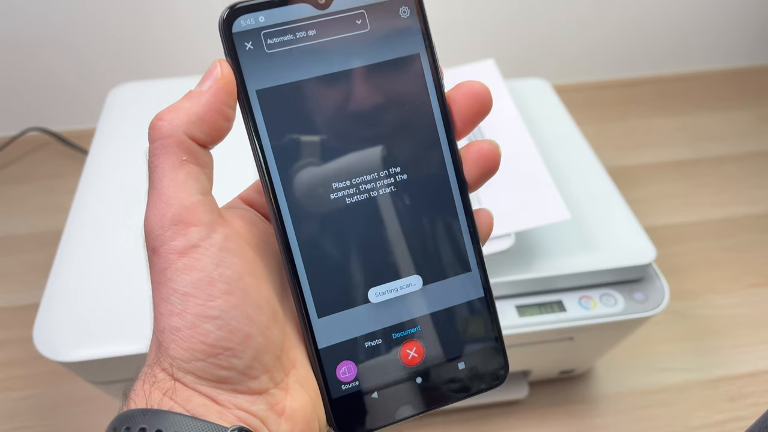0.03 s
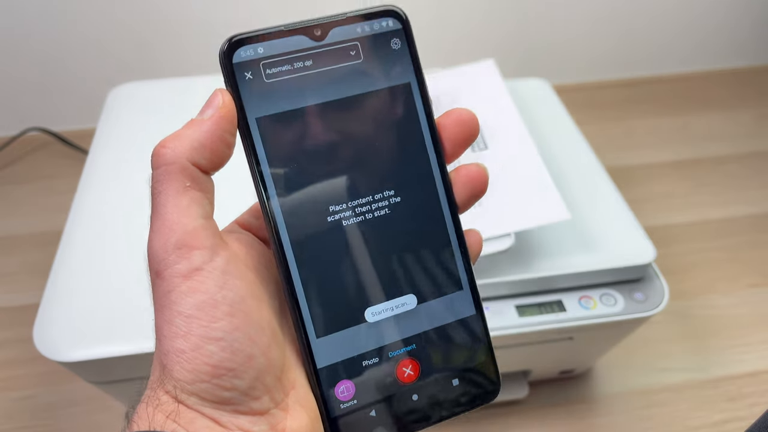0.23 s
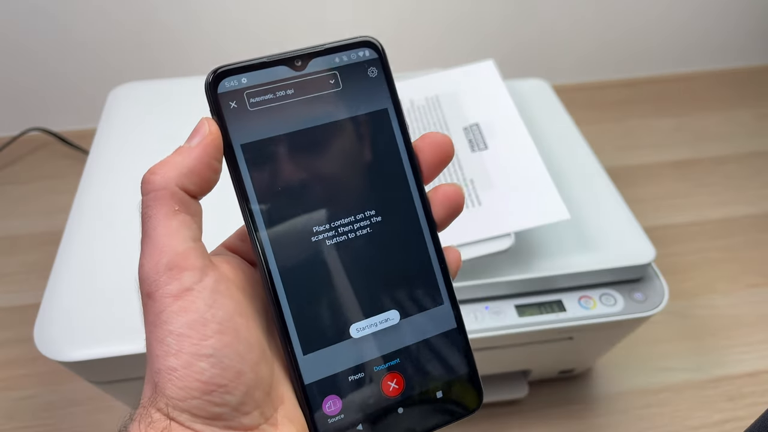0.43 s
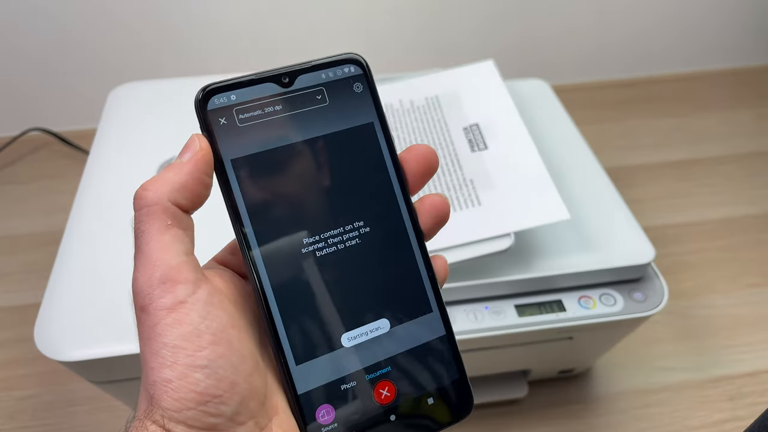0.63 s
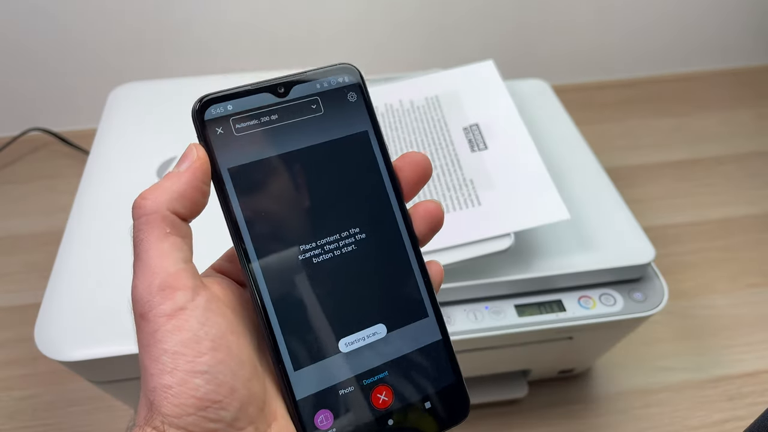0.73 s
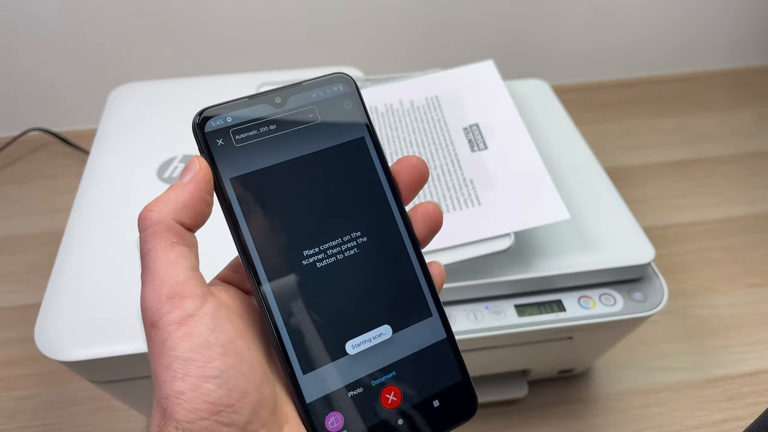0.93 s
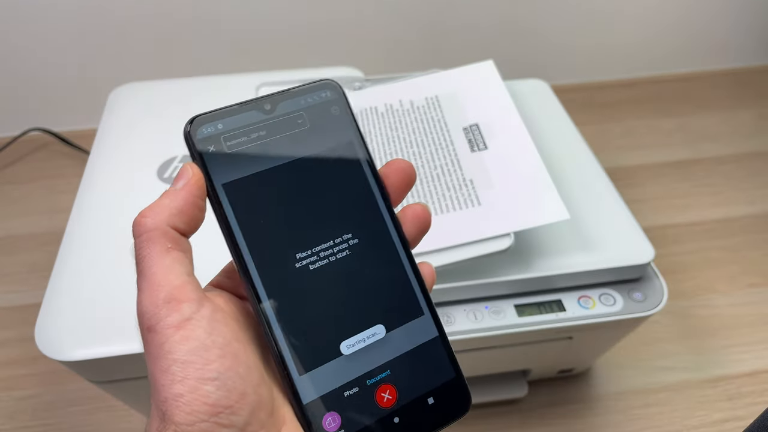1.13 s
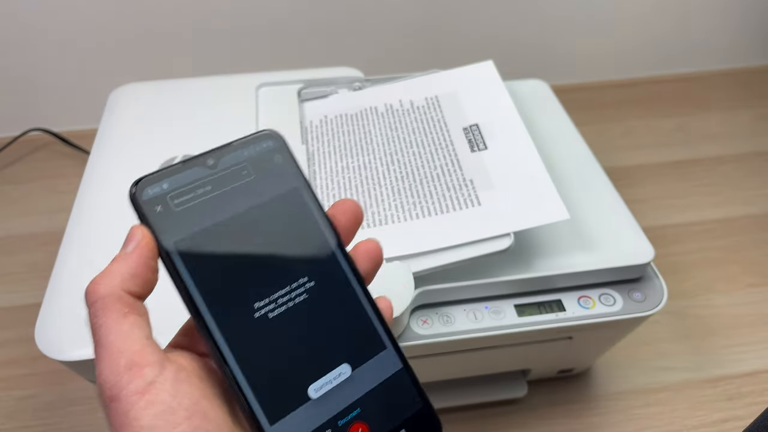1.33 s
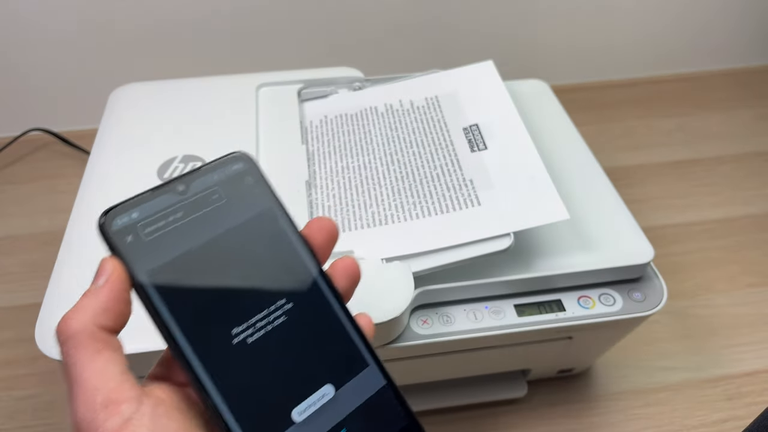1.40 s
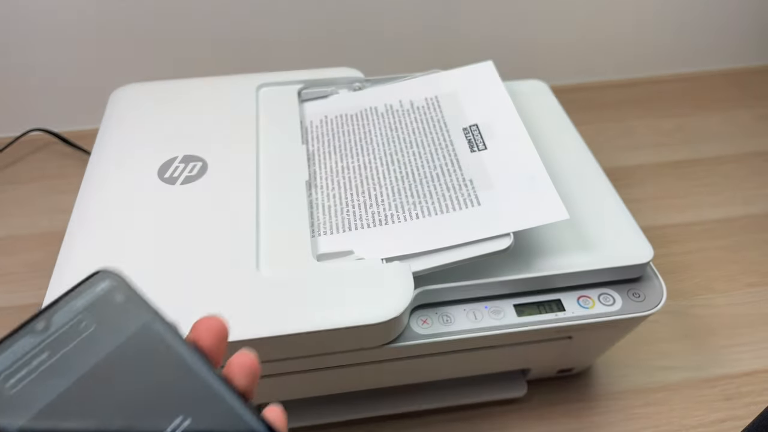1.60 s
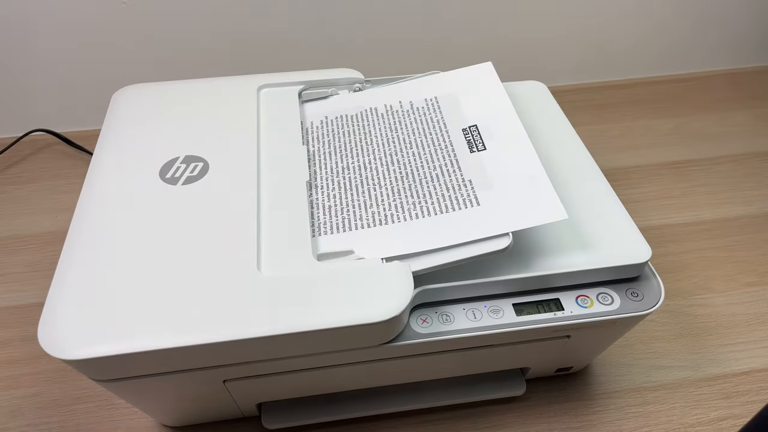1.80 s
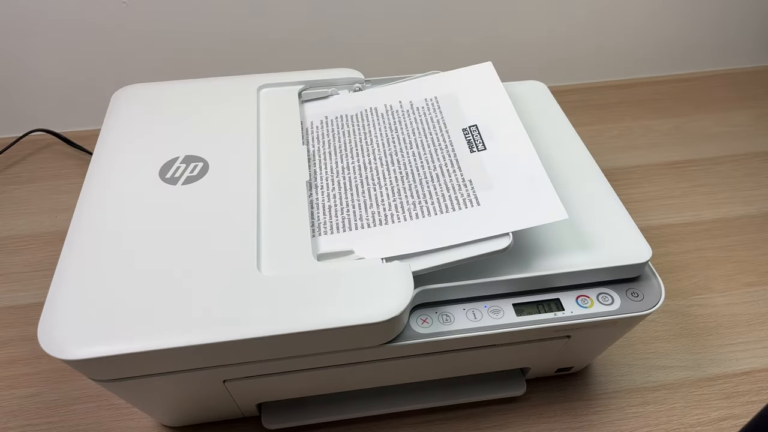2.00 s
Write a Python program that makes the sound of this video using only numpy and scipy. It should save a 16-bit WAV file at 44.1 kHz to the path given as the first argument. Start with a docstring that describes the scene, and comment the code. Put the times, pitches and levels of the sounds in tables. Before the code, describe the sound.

A small printer's feeder motor, close, in a quiet room with a short dull tail. Until 0.9 s only low rumble, mains hum and faint hiss. Then rapid knocks to 1.0 s, a low straining buzz around 1.1 s, and a loud clattering latch clunk at 1.2 s. Rattling gear whir and faint paper rustle continue to 1.6 s, dull knock, brief pause, light knock and restart at 1.75 s, running to the end.

```python
"""Mains hum and low rumble in a quiet room, with faint microphone hiss, before a small desktop printer moves.
Its feeder motor starts with a jolt and strains; a latch snaps over with a clunk; the motor runs on, stops
for a moment and starts again, with paper rustling faintly over the rollers.
Shaft tones and dense tooth impacts make the motor, decaying casing modes and noise the knocks, noise the
paper. The direct sound stands 12 dB above a short, dull tail from desk and walls."""
import sys
import numpy as np
from scipy import signal
from scipy.fft import rfft, irfft
from scipy.io import wavfile
from scipy.ndimage import uniform_filter1d

SR = 44100
rng = np.random.default_rng(int(sys.argv[2]) if len(sys.argv) > 2 else 0)


def wrap_up_sound(samples):
    """Save the sound to the file named by the first command line argument, as 16-bit audio."""
    columns = np.atleast_2d(samples).T
    # keep every value between -1 and 1, then stretch to whole-number steps
    tamed = np.clip(columns, -1, 1)
    steps = np.round(tamed * 32767).astype(np.int16)
    wavfile.write(sys.argv[1], SR, steps)


N = 90449  # samples

# Spectrum of rumble and hiss, relative: pitch_hz, level_db (dB per Hz)
AIR_SPECTRUM = [(15, -18.5), (40, 3), (62, -4.5), (78, -3.5), (95, -15), (200, -21), (400, -26.5),
                (1000, -32.5), (4000, -38.5), (15900, -42)]
AIR_DB = -64.5
# Mains hum: multiple of the mains frequency, level_db
HUM = [(1, -70.5), (2, -87.5), (4, -79), (5, -98.5), (6, -89), (8, -88.5), (10, -104)]
MAINS_HZ = 60

# Motor drive over time: start_s, casing drone level_db, gear rattle level_db, gearbox ringing level_db
DRIVE = [(.9, -99, -127, -90), (.915, -63, -77, -77), (.94, -53, -41.5, -84), (.97, -43.5, -52, -55),
         (1.02, -59, -50.5, -58), (1.06, -47.5, -49.5, -50), (1.13, -89, -47.5, -62),
         (1.17, -54, -52.5, -53), (1.26, -42.5, -45.5, -54), (1.32, -52, -50.5, -52.5),
         (1.5, -55.5, -53, -55), (1.59, -54.5, -53, -53.5), (1.62, -55.5, -61.5, -82),
         (1.68, -72, -66, -76), (1.73, -69, -73, -77), (1.752, -49.5, -51, -53.5),
         (1.85, -53.5, -53, -53.5), (1.95, -55.5, -53, -53), (2.05, -50.5, -51.5, -52.5)]
# Commutator hum, loud while the motor strains: start_s, level_db
STRAIN = [(1.0, -85), (1.04, -46), (1.08, -38), (1.13, -39), (1.18, -46), (1.22, -52), (1.6, -63),
          (1.65, -94), (1.73, -91), (1.76, -58), (2.05, -68)]
# Gear whine: start_s, level_db
WHINE = [(.9, -100), (.925, -58.5), (.96, -69.5), (1.02, -64), (1.05, -61), (1.12, -61), (1.17, -65),
         (1.26, -74), (1.32, -66.5), (1.59, -63.5), (1.63, -108), (1.73, -77), (1.77, -65.5), (2.05, -64)]
# Other shaft orders: multiple of the shaft, level_db against the gear whine
SHAFT_ORDERS = [(6, 2.5), (8, 0.5), (9, 1), (11, -1), (12, -1.5), (13, 3.5), (15, -4.5), (20, -8.5),
                (34, -11), (36, -10.5), (51, -14.5), (53, -17.5), (80, -19)]
# Idler gear tones: multiple of the idler, level_db against the casing drone
IDLER = [(2, -7), (3, -5), (4, -10)]
# Low casing resonances rung by the gears: pitch_hz, width_hz, level_db
CASING = [(134, 60, -4.5), (207, 13.4, -1.5), (230.5, 15, -7), (288, 48, -9), (364, 32, -10.5)]
# Upper gearbox resonances: pitch_hz, width_hz, level_db
GEARBOX = [(450, 77, -7.5), (647, 75, -18.5), (754, 130, -17.5), (1140, 56, -34), (2914, 870, -15.5),
           (4620, 400, -22), (5660, 1150, -30)]
# Gear rattle spectrum, relative: pitch_hz, level_db (dB per Hz)
RATTLE_SPECTRUM = [(70, -3.5), (130, -22), (250, -4), (600, -8), (1300, -13.5), (1600, -18), (2600, -23),
                   (4200, -25), (6500, -40), (9000, -64), (14000, -70)]
SHAFT_HZ, IDLER_HZ = 59.07, 67.1
SPEED_WAVER = .0008  # rms, as a fraction of the shaft speed
GEAR_TEETH = 30
IMPACTS_PER_S, IMPACT_SPREAD_DB = 7000, 1.6
FLUTTER_DB = 1.2  # rms, of each gear-rung resonance

# Blows: start_s, thump level_db, favoured pitch_hz, spread_octaves, clatter level_db, clatter centre_hz,
# clatter t60_s
KNOCKS = [(0.911, -63, 200, 0.68, -87, 1500, 0.023), (0.92, -55, 1500, .4, -57.5, 1480, 0.12),
          (0.9295, -37.5, 408, 0.77, -47, 3530, 0.071), (.940, -53, 1000, 0.88, -58, 3000, 0.025),
          (0.975, -31.5, 197, 0.81, -68, 1510, 0.033), (0.989, -43, 346, 0.23, -60, 1500, 0.053),
          (1.004, -32.5, 100, 0.38, -75, 1500, .04), (1.1885, -43.5, 3280, 0.95, -39.5, 3500, 0.082),
          (1.2037, -32.5, 1350, 0.17, -70, 3000, .03), (1.2085, -31.5, 407, 0.93, -40, 3000, 0.12),
          (1.2143, -26, 189, 0.32, -40.5, 3500, 0.083), (1.222, -30.5, 650, 0.41, -46.5, 6460, 0.086),
          (1.264, -43, 170, 0.54, -67, 3000, 0.068), (1.6, -40.5, 168, 0.17, -86, 2000, 0.036),
          (1.744, -49, 255, 0.77, -72, 2000, 0.068)]
# Modes of the struck casing: pitch_hz, level_db against the thump, t60_s
CASING_MODES = [(58, 2, 0.34), (106, 3, 0.087), (144, -3, 0.045), (187.1, 5, 0.099), (210, -12, 0.66),
                (260, -15, 0.025), (301, 2, 0.09), (378.7, -1, 0.098), (483, -7.5, 0.057), (693, -3.5, 0.1),
                (804, -13.5, 0.21), (1288, 4, 0.017), (2347, 5, 0.081), (3940, 0, 0.04), (6230, -2, 0.054)]
# Spectrum of clattering loose parts, relative: pitch_hz, level_db (dB per Hz)
CLATTER_SPECTRUM = [(500, -5), (1200, 8.5), (1900, -4), (2500, 0.5), (3500, -5.5), (5000, -11.5),
                    (6300, -12.5), (9000, -19), (15900, -29.5)]
BLOW_CYCLES = 0.37  # rise of a thump, in cycles of its favoured pitch
CLATTER_ATTACK_S = .0012

# Paper sliding over the rollers: start_s, level_db
PAPER = [(1.0, -101), (1.05, -76), (1.14, -78), (1.18, -82), (1.28, -71), (1.4, -88.5), (1.9, -91),
         (1.98, -78), (2.05, -80)]
PAPER_HZ, PAPER_WIDTH_HZ = 6940, 3600

RADIATES_HZ = 59.4  # the casing radiates little below this
ROOM_T60_S, ROOM_DB = .33, -12
ROOM_BOTTOM_HZ, ROOM_TOP_HZ = 350, 3700
TOP_HZ = 15800


def undb(db):
    """dB to gain."""
    return 10 ** (np.asarray(db) / 20)


def curve(table, column=1):
    """Gain over time from a dB column of rows led by start_s, silent before the first."""
    rows = np.array(table)
    return undb(np.interp(np.arange(N) / SR, rows[:, 0], rows[:, column], left=-160))


def unit(x):
    """Scale to rms 1."""
    return x / np.sqrt(np.mean(x ** 2))


def colour(x, spectrum):
    """Shape x by a pitch_hz, level_db spectrum, then scale to rms 1."""
    hz, db = np.array(spectrum).T
    log_hz = np.log(np.arange(N // 2 + 1) * SR / N + 1)  # + 1 avoids log(0)
    gain = undb(np.interp(log_hz, np.log(hz), db))
    return unit(irfft(rfft(x) * gain, N))


def ring(x, hz, width_hz):
    """A resonance of gain 1 at its centre."""
    b, a = signal.iirpeak(hz, hz / width_hz, SR)
    return signal.lfilter(b, a, x)


def walk(rate):
    """Smooth random drift of rms 1, averaged twice over 1 / rate seconds."""
    k = int(SR / rate)
    once = uniform_filter1d(rng.standard_normal(N), k)
    return unit(uniform_filter1d(once, k))


def tones(table, phase, waver_db):
    """Multiples of a rotation, each wavering in level."""
    total = np.zeros(N)
    for multiple, db in table:
        gain = np.sqrt(2) * undb(db + waver_db * walk(4.9))  # sqrt(2) gives a sine rms 1
        total += gain * np.sin(multiple * phase + 2 * np.pi * rng.random())
    return total


def background():
    """Low rumble and microphone hiss as shaped noise, and mains hum as harmonics of the supply."""
    mains = 2 * np.pi * MAINS_HZ * np.arange(N) / SR
    air = undb(AIR_DB) * colour(rng.standard_normal(N), AIR_SPECTRUM)
    return air + tones(HUM, mains, .8)


def tooth_impacts():
    """Dense gear-tooth impacts: clicks at random moments, of random sign and strength."""
    chance, side, strength = rng.random((3, N))
    hits = chance < IMPACTS_PER_S / SR
    return hits * np.sign(side - .5) * undb(-IMPACT_SPREAD_DB * np.log(strength + 1e-9))


def rung(impacts, resonances):
    """Tooth impacts ring a set of resonances, each fluttering in level."""
    total = np.zeros(N)
    for hz, width_hz, db in resonances:
        tone = unit(ring(ring(impacts, hz, width_hz), hz, 2 * width_hz))
        total += undb(db + FLUTTER_DB * walk(60)) * tone
    return total


def motor():
    """Shaft orders, gear whine and dense tooth impacts that ring casing and gearbox."""
    shaft = 2 * np.pi * np.cumsum(SHAFT_HZ * (1 + SPEED_WAVER * walk(8.85))) / SR
    impacts = tooth_impacts()
    idler = tones(IDLER, shaft * IDLER_HZ / SHAFT_HZ, 0.94)
    drone = curve(DRIVE) * (rung(impacts, CASING) + idler)
    rattle = curve(DRIVE, column=2) * colour(impacts, RATTLE_SPECTRUM)
    gearbox = curve(DRIVE, column=3) * rung(impacts, GEARBOX)
    # third shaft order with a buzz above it
    strain = curve(STRAIN) * tones([(3, 0), (6.3, -11)], shaft, .8)
    orders = tones([(GEAR_TEETH, 0)], shaft, 1.4) + tones(SHAFT_ORDERS, shaft, 0.5)
    return drone + rattle + gearbox + strain + curve(WHINE) * orders


def thump(t, blow_hz, octaves):
    """A blow rings the casing modes, most strongly near its pitch, each dying away exponentially."""
    total = np.zeros(len(t))
    for hz, db, t60_s in CASING_MODES:
        gain = undb(db + rng.standard_normal())  # each blow differs by about 1 dB per mode
        nearness = np.exp(-.5 * (np.log2(hz / blow_hz) / octaves) ** 2)
        total += gain * nearness * np.exp(-np.log(1000) * t / t60_s) * np.sin(2 * np.pi * hz * t)
    return total * np.minimum(t * blow_hz / BLOW_CYCLES, 1)


def knocks():
    """Each blow thumps the casing and sets loose parts clattering, as a decaying band of uneven noise."""
    t = np.arange(SR // 2) / SR
    out = np.zeros(N + SR)
    noise = colour(rng.standard_normal(N), CLATTER_SPECTRUM) * undb(2.0 * walk(440))
    noise = np.pad(noise, (0, SR))
    for start_s, db, blow_hz, octaves, clatter_db, clatter_hz, decay_s in KNOCKS:
        i = int(start_s * SR)
        clatter = ring(noise[i:i + len(t)], clatter_hz, 1.56 * clatter_hz)
        clatter *= np.exp(-np.log(1000) * t / decay_s) * np.minimum(t / CLATTER_ATTACK_S, 1)
        out[i:i + len(t)] += undb(clatter_db) * clatter - undb(db) * thump(t, blow_hz, octaves)
    return out[:N]


def paper():
    """Paper sliding over the rollers: a faint airy rustle of band-limited noise, uneven in level."""
    hiss = rng.standard_normal(N)
    for _ in range(2):
        hiss = ring(hiss, PAPER_HZ, PAPER_WIDTH_HZ)
    return curve(PAPER) * unit(hiss) * undb(1.6 * walk(60))


def room(x):
    """A short, dull tail from desk and walls: decaying, band-limited noise convolved with the sound."""
    t = np.arange(SR // 2) / SR
    decay = np.exp(-np.log(1000) * t / ROOM_T60_S)
    tail = rng.standard_normal(len(t)) * decay * np.minimum(t / 0.005, 1)  # builds up over 5 ms
    b, a = signal.butter(1, [ROOM_BOTTOM_HZ, ROOM_TOP_HZ], "band", fs=SR)
    tail = signal.lfilter(b, a, tail)
    tail /= np.sqrt(np.sum(tail ** 2))
    return x + undb(ROOM_DB) * signal.fftconvolve(x, tail)[:N]


def scene():
    """The small casing radiates no deep bass; the room and background surround it."""
    no_bass = signal.butter(3, RADIATES_HZ, "high", fs=SR, output="sos")
    printer = signal.sosfilt(no_bass, motor() + knocks() + paper())
    return (room(printer) + background())[None]


def record(dry):
    """The top is cut steeply, by a tenth-order low-pass."""
    return signal.sosfilt(signal.ellip(10, .2, 60, TOP_HZ, fs=SR, output="sos"), dry)


dry = scene()
out = record(dry)
wrap_up_sound(out)
```